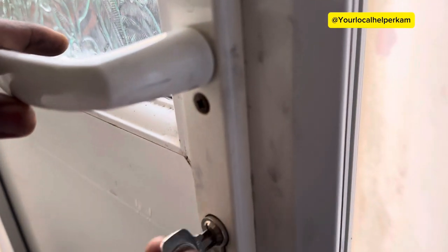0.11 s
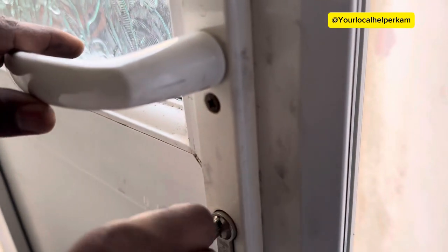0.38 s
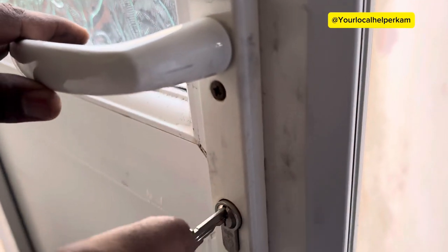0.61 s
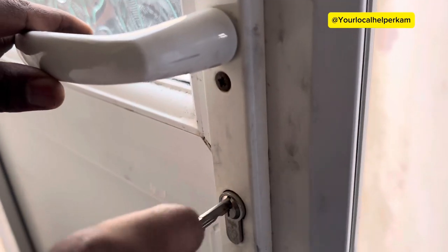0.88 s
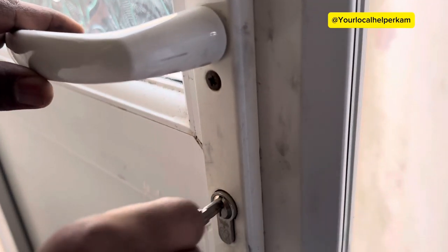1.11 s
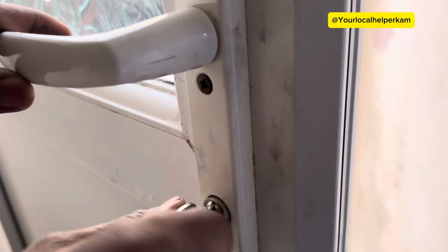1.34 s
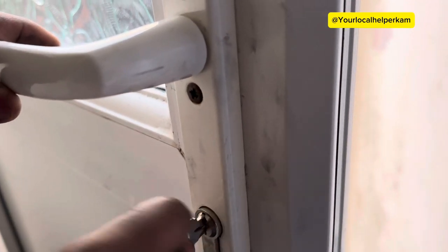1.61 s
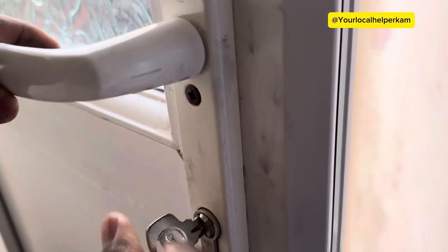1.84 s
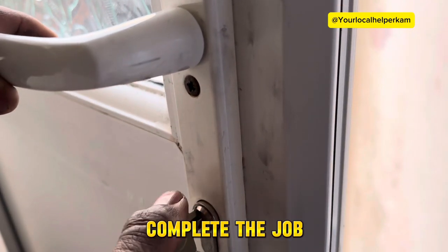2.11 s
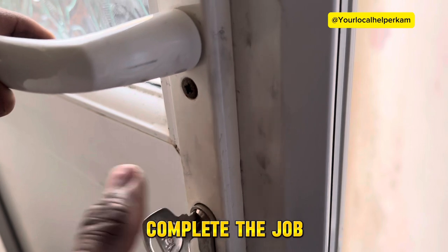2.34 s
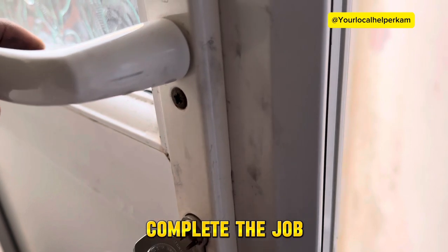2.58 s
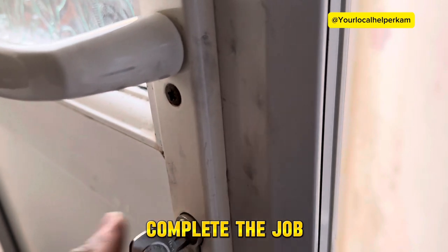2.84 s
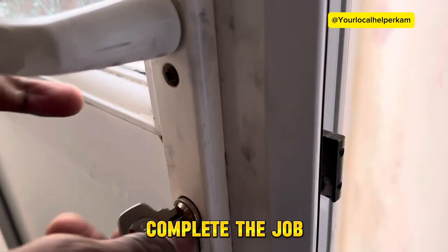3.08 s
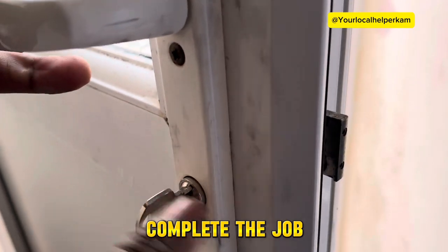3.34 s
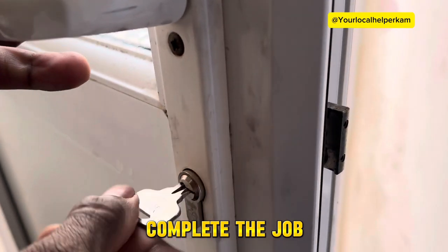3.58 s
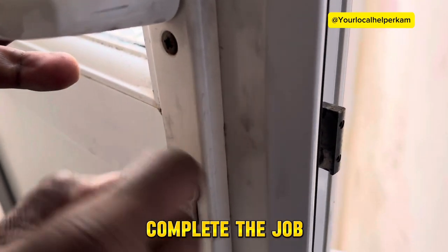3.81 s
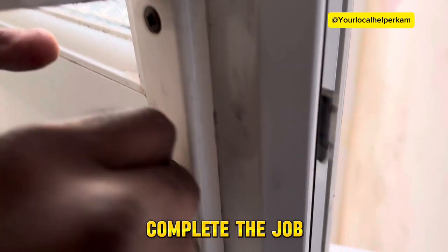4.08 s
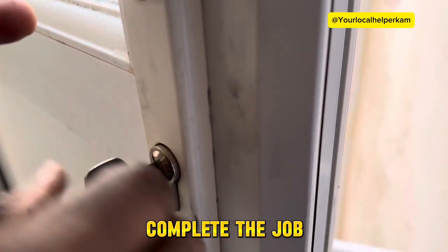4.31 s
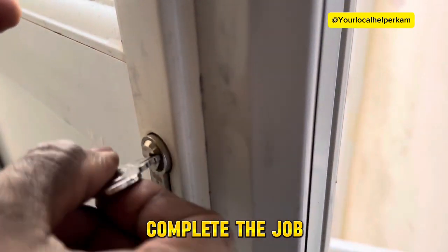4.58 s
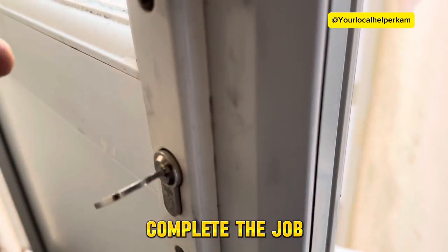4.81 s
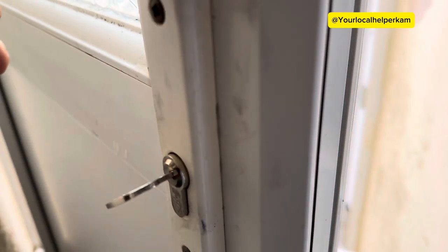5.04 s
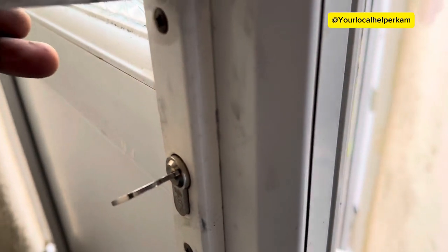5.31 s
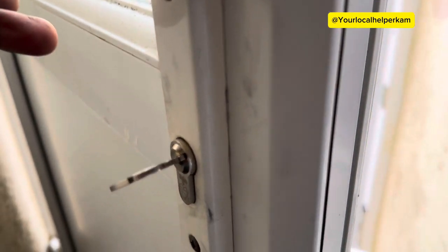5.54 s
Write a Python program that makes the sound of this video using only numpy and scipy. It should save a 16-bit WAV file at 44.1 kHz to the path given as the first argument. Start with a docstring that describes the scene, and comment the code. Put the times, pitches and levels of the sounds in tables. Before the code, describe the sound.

A key is jiggled and turned in a worn door lock up close, with bright metallic clicks, scrapes and hollow plastic knocks.

```python
"""Faint knocks and rubbing over a low outdoor rumble come first; then a key is jiggled and turned, heard close.
Pins, blade, lock case and hollow plastic door ring as resonators struck by short noise bursts, in clusters.
The key's friction is random slips through the same resonators; the door leaf sways and thuds in its low modes.
Cloth rustles once near the end; a hallway and the rooms beyond reverberate, and far noise fills the gaps."""
import sys
import numpy as np
from scipy import signal
from scipy.fft import rfft, irfft, next_fast_len
from scipy.io import wavfile
from scipy.ndimage import uniform_filter1d, map_coordinates

SR = 44100
rng = np.random.default_rng(int(sys.argv[2]) if len(sys.argv) > 2 else 0)


def linear_from_db(decibels):
    """Turn decibels (scalar or array-like) into linear amplitude factors; 0 gives 1."""
    return 10 ** (np.asarray(decibels, float) / 20)


def inscribe(sig):
    """Save sig as 16-bit PCM at rate SR to the path in sys.argv[1].

    A 1-D sig is mono; a 2-D sig holds one channel per row.
    Samples are clipped to [-1, 1] before scaling.
    """
    pcm = np.round(np.clip(np.atleast_2d(sig).T, -1, 1) * 32767)
    wavfile.write(sys.argv[1], SR, pcm.astype(np.int16))


N = 250047

# metal contacts, levels before the trims in contacts():
# t/s, pins level/dB, key blade level/dB, lock case level/dB, door knock level/dB
CONTACTS = [(0.0182, -51, -60, -54, -42), (0.0364, -63, -62, -41.5, -45), (0.127, -35, -51, -47, -48),
            (0.1558, -26, -42, -39, -51), (0.1588, -41, -58, -45, -46), (0.2159, -39, -58, -53, -43),
            (0.2545, -42, -62, -61, -45), (0.3079, -35, -64, -54, -55), (0.3789, -63, -67, -48, -50),
            (0.4118, -32, -45, -47, -37.5), (0.4196, -27, -55, -48, -42.5), (0.446, -28.5, -43, -57, -47.5),
            (0.4774, -34, -44, -40.5, -50), (0.5438, -34, -39, -35.5, -40), (0.5552, -13, -37, -42, -45),
            (0.5653, -20, -41, -52, -42.5), (0.679, -28.5, -57, -68, -64), (0.7097, -22, -53, -38, -54),
            (0.7243, -10.5, -42, -33.5, -39), (0.746, -15.5, -26.5, -18.5, -32.5),
            (0.8379, -18, -38, -40, -39.5), (0.8547, -13.5, -34.5, -42, -40),
            (0.8701, -12.5, -33.5, -31.5, -45), (0.9226, -27.5, -44, -35.5, -45),
            (0.9497, -33, -46, -55, -62), (0.9816, -19, -46, -46, -39.5), (0.9987, -7.5, -44, -31, -33.5),
            (1.0179, -16, -41, -28, -34.5), (1.0267, -31, -35.5, -32, -35.5),
            (1.0367, -23, -34.5, -27, -38.5), (1.0796, -35, -50, -46, -55), (1.1056, -28, -45, -51, -38),
            (1.1285, -19.5, -53, -49, -36.5), (1.1481, -21, -58, -47, -43), (1.2118, -16.5, -42, -39, -43),
            (1.2223, -13, -39, -28, -37), (1.2312, -21, -36, -40, -33.5),
            (1.2384, -9.5, -31.5, -21.5, -31.5), (1.2479, -11.5, -28, -19.5, -38),
            (1.253, -41, -43, -23, -36), (1.4924, -62, -59, -55, -71), (1.599, -51, -56, -42, -62),
            (1.6146, -20.5, -44.5, -53, -52), (1.6425, -48, -61, -45, -52), (1.7009, -52, -59, -52, -66),
            (1.708, -49, -53, -48, -70), (1.7956, -56, -37.5, -34, -50.5), (1.8695, -45, -48, -46, -52.5),
            (1.8993, -32.5, -48, -46.5, -51), (1.9435, -26.5, -37, -37, -53),
            (1.9994, -26.5, -33, -32.5, -42), (2.0592, -46, -30, -30.5, -35.5),
            (2.2401, -71, -84, -45, -43), (2.296, -21, -31, -27.5, -43), (2.3335, -22, -25.5, -21, -32.5),
            (2.3824, -50, -51, -39, -51), (2.4266, -35, -45, -49, -57), (2.438, -31, -46, -42, -50),
            (2.4531, -24, -37.5, -36, -43), (2.4759, -21, -29.5, -30.5, -38),
            (2.4891, -36, -49, -47, -42.5), (2.6552, -69, -63, -49, -46), (2.7982, -16.5, -35.5, -40, -49),
            (2.8291, -24, -39, -35, -58), (2.8345, -37, -41, -29.5, -38), (2.9597, -22.5, -34, -35, -48),
            (2.9672, -16, -31, -45, -44), (2.9841, -38, -29.5, -38, -39.5), (3.0586, -21, -29, -23.5, -36),
            (3.0664, -4, -17.5, -22.5, -41), (3.0705, 3, -20, -19.5, -27), (3.0768, -26, -38, -37, -30.5),
            (3.0822, -31, -22.5, -28, -32.5), (3.0909, -34, -27, -27, -37),
            (3.1571, -26, -34.5, -36.5, -63), (3.1827, -43, -57, -51, -59), (3.2419, -25, -56, -42.5, -54),
            (3.2489, -47, -61, -46, -57), (3.271, -31, -42.5, -53, -59), (3.4812, -31.5, -61, -52, -71),
            (3.492, -28, -57, -50, -65), (3.5166, -28.5, -48, -41, -52), (3.5527, -22, -40, -41, -51),
            (3.5671, -22, -49, -53, -53), (3.5998, -30.5, -46, -42, -51), (3.6379, -31, -39, -23, -39.5),
            (3.7145, -42, -40, -36, -47), (3.818, -16, -34, -44, -42), (3.831, -39, -45, -38, -47),
            (3.8495, -25, -50, -46, -56), (3.9124, -62, -59, -46, -70), (3.9681, -50, -43, -37, -49),
            (3.9758, -26.5, -35, -25.5, -39.5), (4.0494, -10.5, -28, -36, -36.5),
            (4.0841, -45, -46, -38, -48), (4.1052, -52, -55, -35, -44), (4.122, -32, -36, -31, -39.5),
            (4.144, -11, -22, -24.5, -36), (4.1987, -15, -19.5, -18.5, -31), (4.203, -8, -19, -24, -27),
            (4.2083, -15, -18, -38, -40), (4.2117, -16, -25.5, -20.5, -43), (4.2933, -42, -52, -66, -74),
            (4.486, -30, -43, -54, -54), (4.5021, -27, -36, -46, -45.5), (4.5075, -20, -44, -47, -48),
            (4.5334, -16, -41, -43, -43), (4.6536, -38, -37.5, -40.5, -47), (4.656, -23, -45, -33.5, -43),
            (4.7027, -20, -39.5, -42, -49.5), (5.3223, -55, -66, -63, -57), (5.479, -52, -54, -55, -56),
            (5.5666, -62, -76, -72, -52.5), (5.6401, -68, -69, -49, -43)]
# The next four serve contacts() and slide(); level and width are those of a single pass.
# tiny brass pins: f/Hz, width/Hz, level/dB
PINS = [(10180, 2130, 4), (14670, 3500, 2.5)]
# key blade, damped by the fingers: f/Hz, width/Hz, level/dB
BLADE = [(4430, 2550, -3), (6230, 700, 2.5), (7600, 2430, -4)]
# lock case in its plastic frame: f/Hz, width/Hz, level/dB
CASE = [(1366, 480, -0.5), (1833, 361, 5.5), (2101, 654, 4), (2590, 560, 3), (3185, 865, -3)]
# hollow door profile: f/Hz, width/Hz, level/dB
PROFILE = [(347.5, 100, -2), (565.4, 124, -0.5), (704, 160, -0.5), (1057, 370, -4)]


def contacts():
    """Impact excitation: each blow rings pins, blade, case and hollow profile, and the hallway answers."""
    out, size = np.zeros((2, N + SR)), 2048
    ring_db = -5  # steel ring relative to the case column
    for start_s, pins_db, blade_db, case_db, knock_db in CONTACTS:
        hit = linear_from_db(pins_db - 1.0) * burst(0.016, 3, steep(PINS), size)
        hit = hit + linear_from_db(blade_db + 3.0) * burst(0.031, 2.85, steep(BLADE), size)
        hit = hit + linear_from_db(case_db + 2.5) * burst(0.025, 2.1, steep(CASE), size)
        hit = hit + linear_from_db(knock_db + 4) * burst(0.062, 10, steep(PROFILE), size)
        hit = hit + linear_from_db(case_db + ring_db) * ring(size)
        wet = linear_from_db(-8.0) * hall(hit)
        start = round(start_s * SR)
        out[:, start:start + size] += hit
        out[:, start:start + wet.shape[1]] += wet
    return out[:, :N]


def burst(t60, front_db, response, size):
    """Transient excitation: a sharp noise front and a decaying puff drive a resonator at a set energy."""
    t = np.arange(size) / SR
    decay = linear_from_db(-60 * t / t60)
    front = linear_from_db(front_db - 60 * t / 0.0012)
    noise = rng.standard_normal((2, size)) * (decay + front)
    puff = spread(filtered(noise, response))
    # the energy of a sine of unit crest under the decay alone
    return unit(puff) * np.sqrt(np.mean(decay ** 2) / 2)


# steel parts of the lock, damped by the plastic and rung by every contact; nominal before the scatter:
# f/Hz, level/dB, t60/s
STEEL = [(1370, -4, .035), (1500, -6, .03), (1960, -3, .03), (2190, 0, .04), (2555, -3, .04),
         (3410, -6, .03), (4590, -6, .025), (5550, -8, .025), (7120, -6, .03), (7990, -8, .03),
         (11000, -4, .02), (13750, -4, .02)]


def ring(size):
    """Modal superposition: decaying sines, each with a strength, pitch and balance that vary per blow."""
    hz, db, t60 = np.transpose(STEEL)[..., None]
    strength, detune, balance = rng.standard_normal((3, len(STEEL), 1))
    t = np.arange(size) / SR
    scatter_db = 4
    envelope = linear_from_db(db + scatter_db * strength - 60 * t / t60)
    modes = envelope * np.sin(2 * np.pi * hz * (1 + .04 * detune) * t)
    sides = [(modes * linear_from_db(2 * side * balance)).sum(0) for side in (1, -1)]
    return np.array(sides) / np.sqrt(len(STEEL))


# strokes of key and fingers; rise and fall are over 30 dB:
# crest t/s, gritty scrape level/dB, duller rub level/dB, rise t/s, fall t/s
STROKES = [(.03, -45.5, -41.5, 0.29, 0.18), (.2, -46, -43.5, 0.18, 0.2), (.3, -47.5, -46, 0.35, 0.049),
           (.42, -47, -33.5, 0.021, 0.098), (.558, -35.5, -35, 0.053, 0.11),
           (.75, -19, -26.5, 0.073, 0.038), (.85, -33, -31.5, 0.1, 0.15),
           (1.012, -23.5, -26.5, 0.068, 0.075), (1.13, -29, -28.5, 0.067, 0.083),
           (1.24, -20.5, -21.5, 0.062, 0.068), (1.62, -44.5, -44, .03, .13), (1.8, -52, -45.5, 0.044, 0.45),
           (1.95, -68, -58, .3, 0.21), (2.06, -28.5, -23.5, 0.0065, 0.044), (2.34, -51, -32, .04, 0.055),
           (2.48, -39, -32, 0.099, 0.12), (2.65, -54, -54.5, .4, 0.98), (2.8, -45, -37, 0.0082, 0.053),
           (2.89, -58.5, -46, 0.029, 0.058), (2.97, -31.5, -25.5, 0.011, 0.078),
           (3.075, -22, -23, 0.032, .12), (3.25, -48.5, -44.5, 0.05, 0.24), (3.49, -44, -45, .02, 0.31),
           (3.555, -49, -40, 0.1, 0.25), (3.64, -52, -43.5, 0.026, 0.27), (3.82, -27.5, -32, 0.022, 0.076),
           (3.98, -49, -47, 0.021, 0.25), (4.05, -36, -30.5, 0.017, 0.082), (4.14, -41, -35.5, 0.093, .04),
           (4.21, -23.5, -28, 0.021, 0.07), (4.35, -50, -54.5, 0.33, 0.28), (4.495, -49, -38, 0.013, 0.11),
           (4.535, -53, -36, 0.066, 0.095), (4.66, -69, -42, 0.013, .25)]


def slide():
    """Stick-slip friction: the blade grates over the pins; fingers rub the plate with finer grain."""
    def grate(hz):
        return steep(PINS)(hz) + linear_from_db(4.5) * body(BLADE)(hz)

    def plate(hz):
        return body(CASE)(hz) + linear_from_db(-12) * body(PROFILE)(hz)

    scrape_gain, rub_gain = swells(STROKES)
    scrape = crest(spread(filtered(grit(690, size_db=4.0), grate)))
    rub = crest(spread(filtered(grit(2500, size_db=2.5), plate)))
    return scrape_gain * scrape + rub_gain * rub


def grit(rate, size_db):
    """Random point process: sparse slips (rate per second), a few much larger than the rest if size_db > 0."""
    slips = (rng.random(N) < rate / SR) * linear_from_db(size_db * rng.exponential(size=N))
    smear = linear_from_db(-60 * np.arange(256) / SR / 0.018)  # each slip hisses for a moment
    return signal.fftconvolve(slips, smear)[:N] * rng.standard_normal((2, N))


# firm shoves whose thud sags in pitch; level is before the gradual attack:
# t/s, level/dB, first f/Hz, settled f/Hz, t60/s
THUDS = [(1.085, -26, 91, 50.4, 0.65), (2.833, -24, 85.6, 55.7, 0.39), (2.833, -24, 264, 167, 0.098),
         (2.872, -23.5, 170, 155, 0.17)]


def thuds():
    """Stiffness sets pitch: the leaf, pressed hard, is stiffer at first and relaxes."""
    sag_s, attack_s = 0.031, 0.0044  # time constants
    out, t = np.zeros(N + SR), np.arange(SR // 2) / SR
    for start_s, db, first_hz, settled_hz, t60 in THUDS:
        hz = settled_hz + (first_hz - settled_hz) * np.exp(-t / sag_s)
        envelope = linear_from_db(db - 60 * t / t60) * (1 - np.exp(-t / attack_s))
        start = round(start_s * SR)
        out[start:start + len(t)] += envelope * np.sin(2 * np.pi * np.cumsum(hz) / SR)
    return out[:N]


# pushes and pulls on the door leaf; rise and fall are over 30 dB:
# crest t/s, swing level/dB, panel level/dB, rise t/s, fall t/s
PUSHES = [(.0, -53, -47, .1, 0.26), (.24, -42, -70, .3, 0.2), (.55, -44, -51, 0.2, 0.17),
          (.73, -36, -53, 0.086, 0.33), (.79, -56, -42, 0.13, 0.053), (.98, -41, -49, 0.13, 0.26),
          (1.04, -41, -39, 0.082, 0.28), (1.17, -34.5, -58, 0.079, 0.16), (1.27, -39, -44.5, 0.11, 0.16),
          (1.8, -50.5, -55, 0.51, 0.33), (2.08, -57, -47, .3, .1), (2.28, -50, -47, .1, .15),
          (2.7, -56, -52.5, 0.058, 0.17), (2.86, -47, -35.5, 0.1, 0.12), (2.93, -36.5, -49, 0.24, 0.19),
          (3.02, -39, -49, 0.15, .2), (3.09, -41.5, -36.5, 0.13, .2), (3.68, -51, -58, 0.9, .1),
          (3.77, -45, -55, .06, 0.17), (4.22, -56, -48.5, 0.48, 0.07), (4.88, -50.5, -55, 0.051, 0.32),
          (5.3, -51.5, -61.5, 0.54, .4), (5.53, -45, -58, 0.069, 0.42)]
# the leaf swinging on its hinges, relative levels: f/Hz, width/Hz, level/dB
SWING = [(55.4, 12.8, 0.5), (87.4, 73.64, 1.5)]
# its panel flexing, relative levels: f/Hz, width/Hz, level/dB
PANEL = [(146.3, 52.3, 1.5), (222.4, 44, -7.5), (270, 50, -8)]


def leaf():
    """Forced vibration: hand force and draught shake the low modes of the door, adding in power."""
    rest_swing_db, rest_panel_db = -55.5, -63  # at rest in the draught
    unrest_db, unrest_rate = 3, 12  # depth of the unrest, knots per second
    swing_gain, panel_gain = swells(PUSHES)
    swing_gain = np.hypot(swing_gain, linear_from_db(rest_swing_db + unrest_db * wobble(unrest_rate)))
    panel_gain = np.hypot(panel_gain, linear_from_db(rest_panel_db + unrest_db * wobble(unrest_rate)))
    return swing_gain * sway(SWING) + panel_gain * sway(PANEL)


def sway(modes):
    """Narrow-band vibration as random frequency modulation: each mode's pitch wanders in scale with its width."""
    wander = uniform_filter1d(rng.standard_normal((2, len(modes), N)), 900, axis=2)
    hz, width, db = np.transpose(modes)[..., None]
    phase = 2 * np.pi * np.cumsum(hz + 0.44 * width * unit(wander), axis=2) / SR
    return unit(spread((linear_from_db(db) * np.sin(phase)).sum(axis=1)))


# a sleeve brushes past as the hand draws back; rise and fall are over 30 dB:
# crest t/s, swish level/dB, rise t/s, fall t/s
SWISH = [(4.87, -44, 0.35, 0.32), (4.94, -46, 0.42, 0.087)]
# colour of the cloth, relative spectrum: f/Hz, level/dB
CLOTH = [(290, -42.5), (500, -14), (900, -2), (2460, -7.5), (6000, -9.5), (10500, -14.5), (15000, -18.5)]


def sleeve():
    """Friction noise: dense small slips of cloth merge into a coloured rustle."""
    swish_gain, = swells(SWISH)
    rustle = filtered(grit(5000, size_db=-0.5), lambda hz: linear_from_db(along(CLOTH, hz)))
    return swish_gain * unit(spread(rustle))


# hallway: f/Hz, t60/s
HALL = [(300, 0.3), (2000, 0.14), (8000, .13), (15000, 0.029)]


def hall(x):
    """Reverberation as decaying noise: a fresh tail per call, each frequency dying at its own speed."""
    hz, t, z = signal.stft(rng.standard_normal((2, SR // 5)), SR, nperseg=256)
    decay = linear_from_db(-60 * t / along(HALL, hz)[:, None])
    tail = spread(signal.istft(z * decay, SR, nperseg=256)[1])
    delayed = np.pad(x.mean(0), (120, 0))  # samples before the first reflection
    return signal.fftconvolve(delayed[None], tail / np.linalg.norm(tail[0]), axes=1)


def house(x):
    """Coupled-room reverberation: a long, dull, weak tail from the rooms beyond."""
    level_db, t60 = -24, 0.39
    t = np.arange(SR // 2) / SR
    noise = rng.standard_normal((2, len(t))) * linear_from_db(-60 * t / t60)
    tail = filtered(noise, lambda hz: 1 / (1 + 1j * hz / 2500))
    wet = signal.fftconvolve(x.mean(0)[None], tail / np.linalg.norm(tail[0]), axes=1)
    return linear_from_db(level_db) * wet[:, :N]


# distant street and house, relative spectrum: f/Hz, level/dB
AIR = [(110, -11.5), (180, -6.5), (220, -6), (500, -15.5), (800, -15), (2170, -32), (5000, -37.5),
       (9000, -38.5), (14000, -38), (16000, -60)]


def air():
    """Stationary shaped noise: many far sources merge, their level drifting slowly."""
    level_db = -53.5 + 2 * wobble(3)
    noise = filtered(rng.standard_normal((2, N)), lambda hz: linear_from_db(along(AIR, hz)))
    return linear_from_db(level_db) * unit(spread(noise))


def body(modes):
    """Modal resonance: a causal sum of damped oscillators of alternating sign."""
    def response(f):
        total = 0
        for k, (centre, width, db) in enumerate(modes):
            resonance = 1j * f * width / (centre * centre - f * f + 1j * f * width)
            total = total + (-1) ** k * linear_from_db(db) * resonance
        return total
    return response


def steep(modes):
    """Cascaded resonance: two passes, so that little leaks outside the modes."""
    return lambda f: body(modes)(f) ** 2


# likeness of left and right for spread sound: f/Hz, coherence (0-1)
ALIKE = [(60, 1), (140, 0.65), (330, 0.95), (700, 0.47), (1500, 0.25), (4000, 0.19), (7000, 0.34)]


def spread(pair):
    """Interaural coherence: two unrelated signals become left and right of the given likeness."""
    def mid_side_gains(hz):
        angle = np.arccos(np.clip(along(ALIKE, hz), -1, 1)) / 2
        return np.array([np.cos(angle), np.sin(angle)])

    mid, side = filtered(pair, mid_side_gains)
    return np.array([mid + side, mid - side])


def swells(rows):
    """Incoherent power addition: rows rise and fall straight in dB; one gain per level column."""
    power, t = 0, np.arange(N) / SR
    for crest_s, *levels_db, rise_s, fall_s in rows:
        lost_db = 30 * np.maximum((crest_s - t) / rise_s, (t - crest_s) / fall_s)
        power = power + linear_from_db(levels_db)[:, None] ** 2 * linear_from_db(-2 * lost_db)
    return np.sqrt(power)


def wobble(rate):
    """Band-limited fluctuation: a smooth random curve, rate knots a second."""
    knots = rng.standard_normal(int(N * rate / SR) + 4)
    return map_coordinates(knots, [np.arange(N) * rate / SR])


def filtered(x, response):
    """Linear filtering: the spectrum times a complex response of frequency."""
    m = next_fast_len(x.shape[-1] + 8192)
    return irfft(rfft(x, m) * response(np.fft.rfftfreq(m, 1 / SR)), m)[..., :x.shape[-1]]


def along(points, hz):
    """Logarithmic frequency scale: interpolates (f/Hz, value) points."""
    f, v = np.transpose(points)
    return np.interp(np.log(hz + 1), np.log(f + 1), v)


def unit(x):
    """Effective value: scaled to rms 1."""
    return x / np.sqrt(np.mean(x ** 2) + 1e-20)


def crest(x):
    """Crest level: scaled so that the usual crests reach 1."""
    return x / np.percentile(np.abs(x), 95)


def scene():
    """Superposition with an intensity difference: the whole mix sits a little to the left."""
    lock = contacts() + slide()
    mix = lock + house(lock) + sleeve() + leaf() + thuds() + air()
    return mix * linear_from_db(np.array([[.9], [-.9]]))


def band_limit(x):
    """A steep low-pass at the top of the band."""
    return signal.sosfilt(signal.butter(12, 16500, fs=SR, output="sos"), x)


def record(dry):
    """Saturation and interchannel delay: peaks round off; above a crossover one capsule feeds both sides."""
    cross_hz, turn_hz = 8075, 3050  # left turns one full cycle against right every turn_hz
    top_hz, edge_hz = 15500, 16450  # microphone fade-out, then a steep upper edge
    leak_db = -17  # what each side keeps of its own treble, before the fade

    def high(hz):
        return 1 / (1 + (cross_hz / (hz + 1)) ** 16)

    def fade(hz):
        return 1 / (1 + (hz / top_hz) ** 24) / (1 + (hz / edge_hz) ** 200)

    def shared(hz):
        lag = np.exp(-1j * np.pi * np.maximum(hz - cross_hz, 0) / turn_hz)  # left lags, right leads
        return linear_from_db(-2.35) * high(hz) * fade(hz) * np.array([lag, 1 / lag])

    def separate(hz):
        return 1 - high(hz) * (1 - linear_from_db(leak_db) * fade(hz))

    rounded = dry / (1 + np.abs(dry / .8) ** 4) ** (1 / 4)
    mix = filtered(rounded, separate) + filtered(rounded[0], shared)
    return band_limit(mix)


dry = scene()
out = record(dry)
inscribe(out)
```